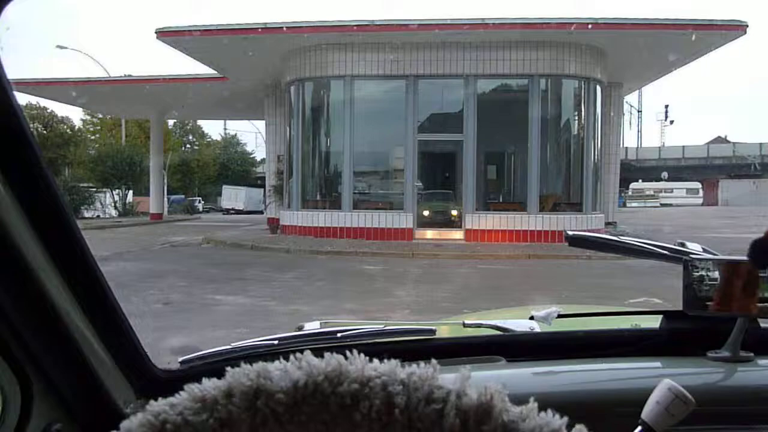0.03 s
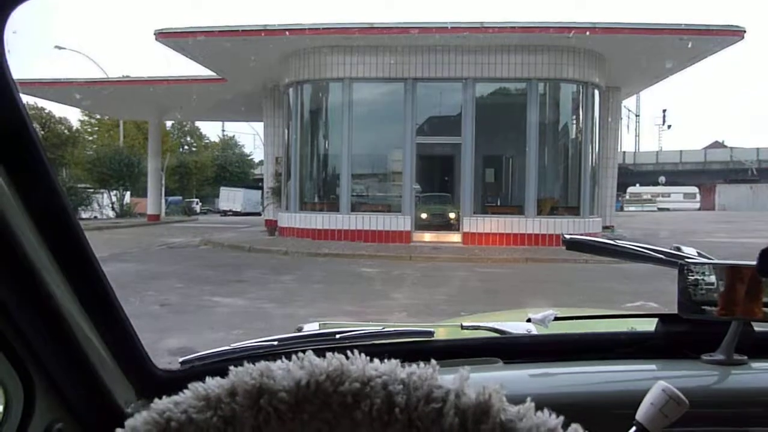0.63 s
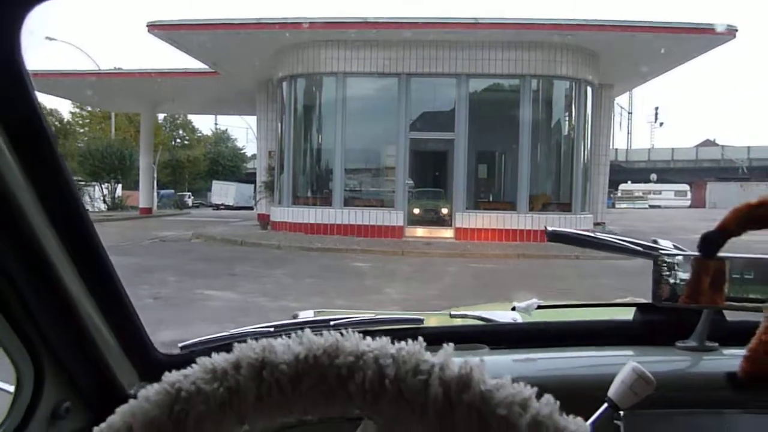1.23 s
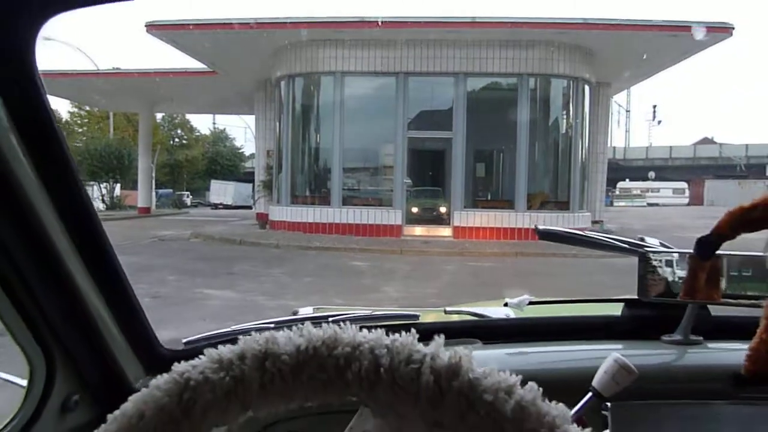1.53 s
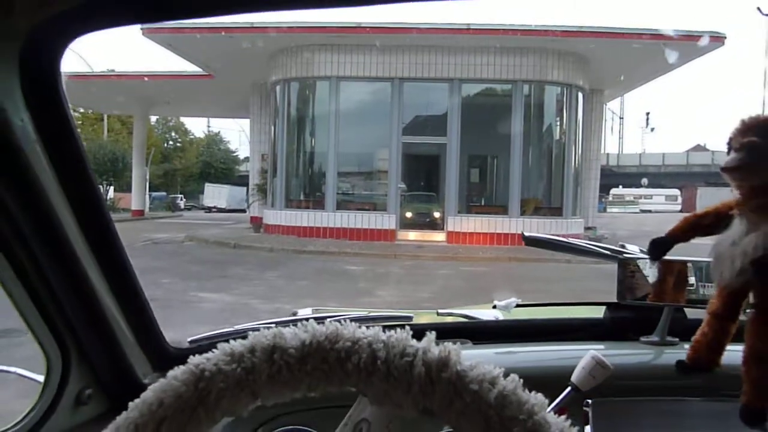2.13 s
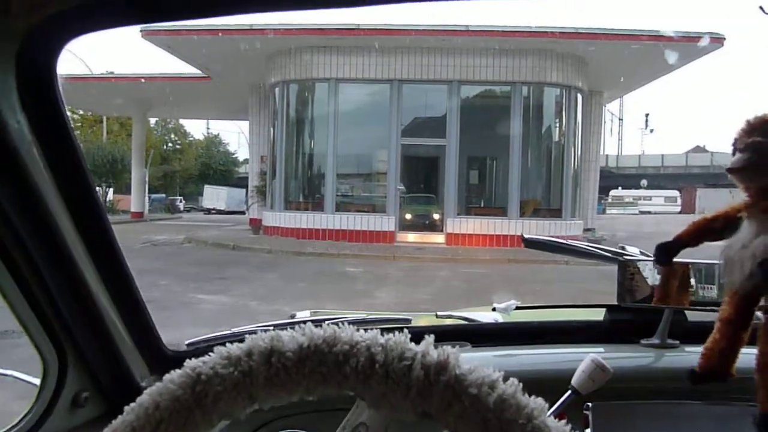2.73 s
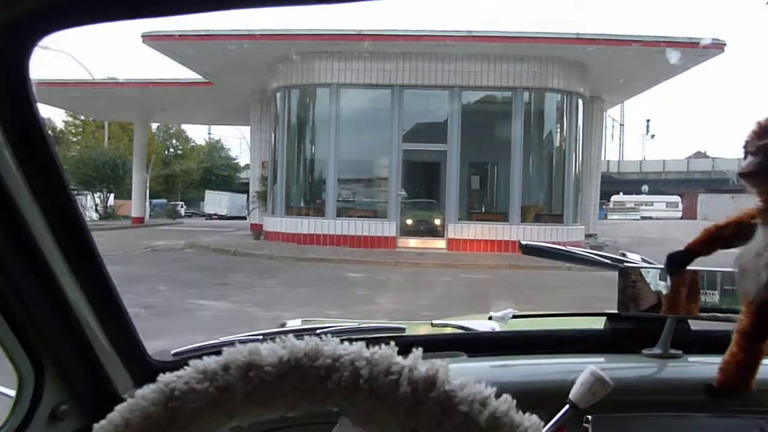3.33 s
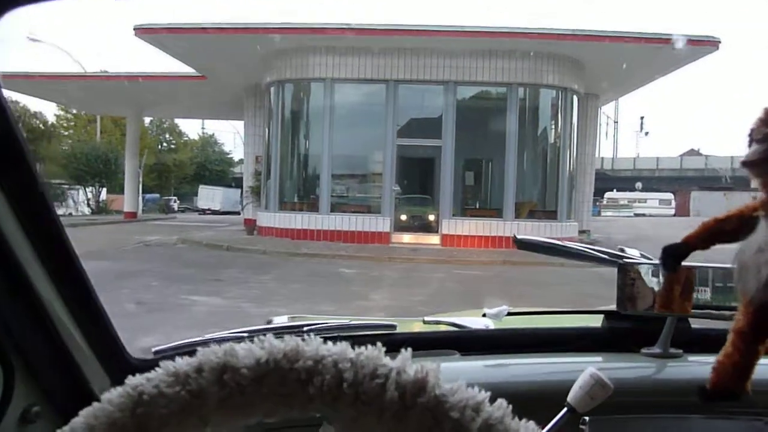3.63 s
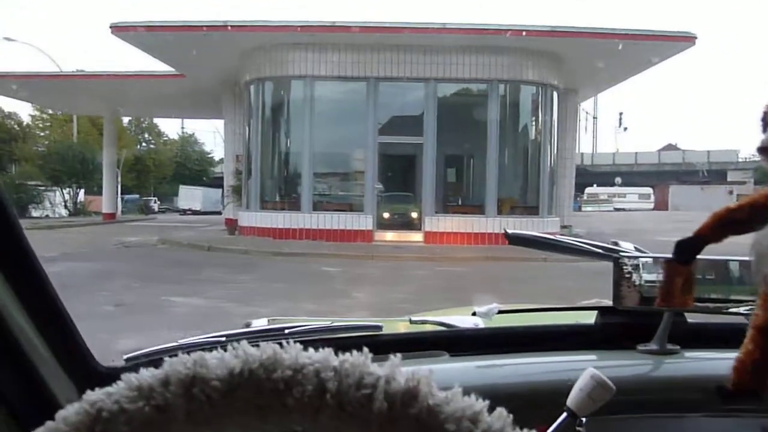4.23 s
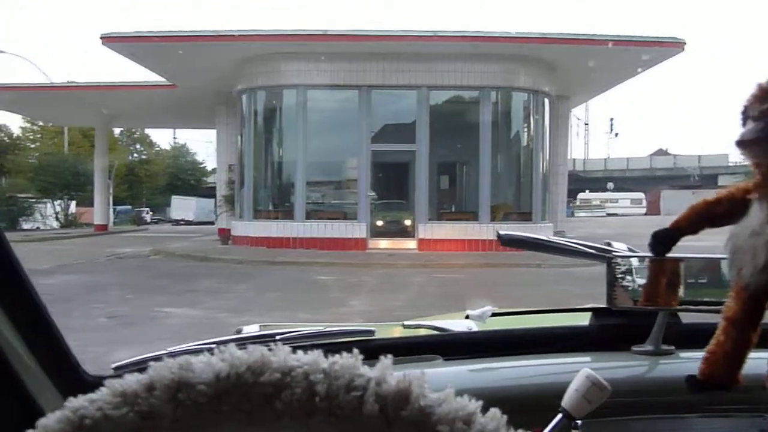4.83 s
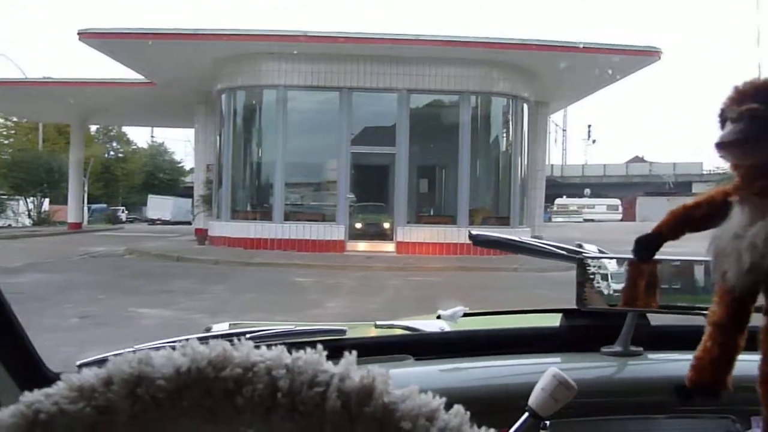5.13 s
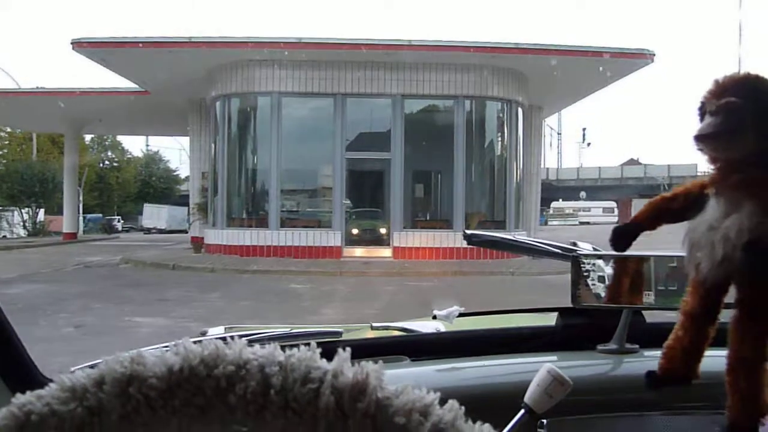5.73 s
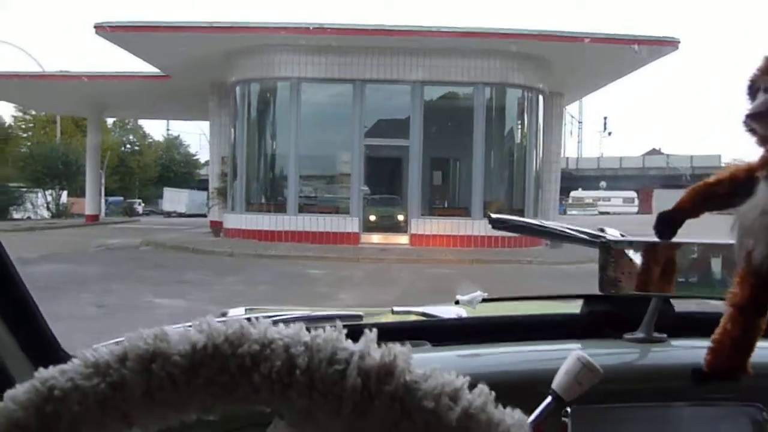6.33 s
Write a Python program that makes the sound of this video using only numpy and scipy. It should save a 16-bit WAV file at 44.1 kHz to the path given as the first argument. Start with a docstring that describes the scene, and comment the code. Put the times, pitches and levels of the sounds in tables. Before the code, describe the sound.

After silence, at about 0.6 seconds, the idle of a small old two-stroke car engine cuts in abruptly, heard from the driver's seat inside the cabin. It is a fast, low putter that holds the same overall speed but surges unevenly, about seven times a second. Each surge brings a short, hollow exhaust boom, over a deep hum from the shaking body and the drumming of sheet-metal panels. A lighter mechanical clatter comes from behind the dashboard. Loose metal parts give brief, faint clanks and clinks, scattered between 0.6 and 1.7 seconds and more often from about 2.9 seconds onward. The booming pulses grow slightly stronger after 3 seconds. At about 6 seconds a loose fitting gives two tiny, bright ticks in very quick succession. The engine keeps idling until the end, at about 6.4 seconds.

```python
"""The uneven idle of a small old two-stroke car engine cuts in after half a second of silence, heard from
the driver's seat. It fires about forty times a second and surges about seven times a second.
The body shakes, exhaust puffs excite booming standing waves in the cabin, and sheet-metal panels drum.
Behind the dashboard, pistons and loose parts clatter by impact; near the end a fitting ticks twice."""
import sys
import numpy as np
from scipy import signal
from scipy.fft import rfft, irfft, next_fast_len
from scipy.io import wavfile
from scipy.ndimage import uniform_filter1d

SR = 44100
rng = np.random.default_rng(int(sys.argv[2]) if len(sys.argv) > 2 else 0)


def file_out(sig):
    """Save sig as 16-bit WAV at sys.argv[1]."""
    # one column per channel
    cols = np.atleast_2d(sig).T
    # limit, then scale
    lim = np.clip(cols, -1, 1)
    pcm = np.round(lim * 32767).astype(np.int16)
    wavfile.write(sys.argv[1], SR, pcm)


N = 281313
TIME = np.arange(N) / SR

# Surges, where the engine catches for a few strong burns:
# (time [s], cabin boom [dB], drumming over idle [dB], clatter over idle [dB], shake over idle [dB])
SURGES = [(0.604, -38.0, 3.0, 3.5, 2.0), (0.733, -44.0, 4.0, 2.5, 2.0), (0.897, -49.0, 3.0, -1.0, 1.0),
          (1.138, -40.0, 3.0, 2.5, 2.0), (1.297, -37.0, 1.0, -0.0, -0.0), (1.415, -40.0, 3.0, 3.0, 2.0),
          (1.612, -43.0, 4.0, 2.0, 1.0), (1.756, -39.0, 2.0, 3.5, 1.0), (1.862, -45.0, -3.0, -2.0, -2.0),
          (2.039, -52.0, 4.0, 2.0, -0.0), (2.109, -38.0, 6.0, 0.0, 1.0), (2.273, -38.0, 3.0, -1.0, -0.0),
          (2.435, -45.0, -0.0, -0.5, 0.0), (2.673, -46.0, 0.0, 2.5, 4.0), (2.769, -39.0, 3.0, 3.0, 3.0),
          (2.879, -42.0, 6.0, 5.0, 5.0), (3.016, -40.0, 3.0, 0.5, 1.0), (3.111, -39.0, 4.0, 4.0, 4.0),
          (3.235, -34.0, 3.0, 1.5, 1.0), (3.411, -40.0, 4.0, 1.5, 0.0), (3.559, -37.0, 3.0, 2.5, 5.0),
          (3.731, -35.0, 1.0, 2.5, 7.0), (3.888, -39.0, 3.0, 1.0, 3.0), (4.022, -48.0, 1.0, 2.0, 2.0),
          (4.148, -34.0, 1.0, 0.5, 3.0), (4.296, -34.0, -0.0, 3.5, 3.0), (4.449, -37.0, 3.0, 1.5, 1.0),
          (4.591, -36.0, 3.0, 2.0, 2.0), (4.733, -38.0, 2.0, 4.5, 8.0), (4.866, -43.0, -3.0, 2.5, 7.0),
          (4.967, -42.0, 2.0, 1.0, 8.0), (5.148, -38.0, -3.0, 0.5, 6.0), (5.333, -41.0, -1.0, 2.0, 5.0),
          (5.472, -36.0, 0.0, 1.0, 5.0), (5.624, -40.0, -1.0, 0.0, 5.0), (5.739, -43.0, -2.0, 0.5, -0.0),
          (5.897, -35.0, -0.0, 1.5, 4.0), (6.053, -39.0, -0.0, 1.0, 3.0), (6.207, -40.0, 1.0, 1.5, 1.0),
          (6.326, -42.0, -1.0, 0.5, -4.0)]


def from_db(db):
    """Logarithmic level: amplitude grows tenfold every 20 dB."""
    return 10 ** (np.asarray(db) / 20)


def unit_power(x):
    """Normalisation: divide by the root mean square."""
    return x / np.sqrt(np.mean(x ** 2) + 1e-20)


def steady(x, span_s):
    """Running normalisation: unit power over each span, while quicker detail stays."""
    power = uniform_filter1d(x ** 2, max(int(span_s * SR), 3))
    return x / np.sqrt(np.abs(power) + 1e-12)


def in_time(rows):
    """Linear interpolation: each column of a time table at every sample."""
    times, *columns = np.transpose(rows)
    return [np.interp(TIME, times, column) for column in columns]


def resonate(x, hz, width_hz):
    """Damped resonance: a two-pole band-pass with unit gain at its peak."""
    radius = np.exp(-np.pi * width_hz / SR)
    feedback = [1, -2 * radius * np.cos(2 * np.pi * hz / SR), radius ** 2]
    return signal.lfilter(np.array([1, 0, -1]) * (1 - radius ** 2) / 2, feedback, x + 1e-18)


def modes(x, table):
    """Modal superposition: resonances driven in parallel add up."""
    return sum(from_db(db) * resonate(x, hz, width) for hz, width, db in table)


def boost(x, table):
    """Resonant emphasis: each mode in turn lifts the band around its frequency."""
    for hz, width, db in table:
        x = x + (from_db(db) - 1) * resonate(x, hz, width)
    return x


def colour(x, spectrum):
    """Spectral shaping: apply a gain curve that falls 24 dB per octave beyond both ends."""
    hz, db = np.transpose(spectrum)
    size = next_fast_len(N + SR // 4)
    octave = np.log2(np.maximum(np.arange(size // 2 + 1) * SR / size, 1))
    skirt_db = -24 * np.abs(octave - np.clip(octave, np.log2(hz[0]), np.log2(hz[-1])))
    gain = from_db(np.interp(octave, np.log2(hz), db) + skirt_db)
    return irfft(rfft(x, size) * gain, size)[:N]


def strokes(crank, phase, spread_db, jitter_s):
    """Impulse train: one click per firing at a fraction of the cycle, scattered in time and strength."""
    due_s = np.interp(np.arange(1, int(crank[-1])) + phase, crank, TIME)
    timing, strength = rng.standard_normal((len(due_s), 2)).T
    index = np.clip(((due_s + jitter_s * timing) * SR).astype(int), 0, N - 1)
    clicks = np.zeros(N)
    clicks[index] = from_db(spread_db * np.clip(strength, -2, 1.5))
    return clicks


def burst(clicks, decay_s):
    """Exponential decay: each click starts a dying cloud of noise; the whole has unit power."""
    envelope = signal.lfilter([1], [1, -np.exp(-1 / (decay_s * SR))], clicks + 1e-18)
    return unit_power(envelope * rng.standard_normal(N))


def swells(sizes, lead_s, half_width_s):
    """Gaussian envelopes: one bell of the given size peaks lead_s before each surge."""
    coarse = TIME[::40]
    bells = sum(size * np.exp(-((coarse - surge[0] + lead_s) / half_width_s) ** 2)
                for surge, size in zip(SURGES, sizes))
    return np.interp(TIME, coarse, bells)


def surge_levels():
    """Amplitude modulation: a surge reaches panels and block first, then the cabin air, then the body."""
    # The idle between surges: (time [s], body shake [dB], panel drumming [dB], clatter [dB])
    idle = [(.57, -34.5, -40.5, -55.5), (1.1, -35.5, -40, -57.5), (2.3, -35, -39.5, -56.5),
            (2.7, -36.5, -38, -57), (3.45, -35.5, -38, -55.5), (3.7, -38, -37, -56), (4.5, -35, -38, -55.5),
            (4.8, -39.5, -38.5, -57.5), (5.5, -39, -38, -56.5), (6.38, -35, -38.5, -56)]
    shake_db, panel_db, clatter_db = in_time(idle)
    _, surge_boom_db, panel_lift_db, clatter_lift_db, shake_lift_db = np.transpose(SURGES)
    panel_db += swells(panel_lift_db, lead_s=.028, half_width_s=.023)
    clatter_db += swells(clatter_lift_db, lead_s=.023, half_width_s=.023)
    resting_boom = from_db(-46.5)
    boom = resting_boom + swells(from_db(surge_boom_db), lead_s=0, half_width_s=.045)
    shake_db += swells(shake_lift_db, lead_s=-.0045, half_width_s=.033)
    return shake_db, 20 * np.log10(boom), panel_db, clatter_db


def body_hum(crank, shake_db):
    """Forced vibration: the engine rocks on its mounts at harmonics of the firing rate."""
    # Engine orders: (multiple of the firing rate, level relative to the shake [dB])
    orders = [(1, -.8), (2, -11), (3, -20), (5, -24), (6, -12.5), (7, -22), (8, -13)]
    surge_db = shake_db - uniform_filter1d(shake_db, SR // 4)
    # The crank runs ahead in each surge and drops back after it.
    cycles = crank + .009 * np.interp(TIME - .035, TIME, surge_db)
    harmonics = sum(-np.sqrt(2) * from_db(db) * np.sin(2 * np.pi * k * cycles) for k, db in orders)
    return from_db(shake_db) * harmonics


def silencer_rumble(crank, shake_db, boom_db):
    """Cycle-to-cycle variation: no two burns are alike, so the exhaust flutters between engine orders."""
    # Unsteady gas flow in the silencer: (frequency [Hz], relative spectral level [dB])
    spectrum = [(22, -2), (33, 1), (46, -2), (58, -4), (72, 0), (86, 2), (98, -2), (112, -1), (125, 0),
                (136, -9)]
    flow = burst(strokes(crank, phase=.24, spread_db=1.5, jitter_s=.0008), decay_s=.024)
    level_db = .7 * shake_db + .3 * boom_db - 2.9
    return steady(colour(flow, spectrum), span_s=.06) * from_db(level_db)


def cabin_boom(crank, boom_db, panel_db):
    """Standing waves: uneven exhaust puffs with turbulent tails ring the cabin air."""
    # Higher modes of the cabin air: (frequency [Hz], bandwidth [Hz], relative gain [dB])
    air_modes = [(238.2, 8.5, -3), (284.5, 7.3, -6.5), (320.6, 11, -6)]
    boom_hz, width_hz = 159.5, 14  # the strongest standing wave
    puffs = strokes(crank, phase=.2, spread_db=6.5, jitter_s=.00044)
    flow = unit_power(puffs) + from_db(6) * burst(puffs, decay_s=.024)
    drone = steady(modes(flow, air_modes), span_s=.055) * from_db(panel_db - 9.5)
    wave = resonate(resonate(flow, boom_hz, width_hz), boom_hz, 2 * width_hz)
    return drone + steady(wave, span_s=.077) * from_db(boom_db)


def panel_drumming(crank, panel_db):
    """Plate vibration: each firing and the rebound after it set the sheet metal drumming."""
    # Floor, doors and bulkhead: (frequency [Hz], relative spectral level [dB])
    spectrum = [(190, -5), (240, -3.5), (295, 1.5), (370, -7), (450, -7.5), (510, -12.5), (640, -15),
                (720, -20.5), (850, -18.5), (1050, -22.5), (1300, -24.5), (1700, -37.5), (2500, -38.5)]
    # Ringing of the sheet metal: (frequency [Hz], bandwidth [Hz], boost [dB])
    panel_modes = [(432, 30, 3), (535, 24, 3), (630, 30, 3), (765, 24, 4), (904, 26, 7), (936, 22, 6),
                   (1085, 20, 3), (1195, 20, 3), (1268, 22, 7)]
    knocks = strokes(crank, phase=.22, spread_db=-1, jitter_s=.00068)
    rebounds = strokes(crank, phase=.65, spread_db=.5, jitter_s=.0033)
    drive = burst(knocks + 1.1 * rebounds, decay_s=.035)
    sheet = boost(colour(drive, spectrum), panel_modes)
    return steady(sheet, span_s=.16) * from_db(panel_db)


def block_clatter(crank, clatter_db):
    """Impact excitation: piston slap and looser taps ring the block, over the rush of the fan."""
    # Engine block and fittings: (frequency [Hz], relative spectral level [dB])
    spectrum = [(900, 3), (1500, 8), (2100, 4), (2700, 2), (3300, 1), (4000, -4), (4600, -5), (5200, -10),
                (6100, -14), (6800, -43)]
    # Ringing of the block: (frequency [Hz], bandwidth [Hz], boost [dB])
    block_modes = [(1500, 30, 3), (2012, 36, 7.5), (2160, 60, 4), (2460, 36, 7.5), (3000, 50, 2),
                   (3320, 80, 4.5), (3668, 36, 5.5), (5540, 80, 3.5), (6560, 70, 4)]
    slap = strokes(crank, phase=.12, spread_db=3, jitter_s=.0011)
    taps = strokes(crank, phase=.26, spread_db=6, jitter_s=.003)
    taps += strokes(crank, phase=.6, spread_db=.5, jitter_s=.004)
    impacts = burst(slap, decay_s=.0069) * from_db(-5) + burst(taps, decay_s=.0023) * from_db(-7)
    fan = rng.standard_normal(N)
    block = boost(colour(impacts + fan, spectrum), block_modes)
    return steady(block, span_s=.052) * from_db(clatter_db)


def loose_rattles():
    """Contact chatter: a quick swell of small collisions excites the modes of a loose part."""
    # Loose parts thrown by the hardest surges: (time [s], low clank [dB], high clink [dB])
    hard_rattles = [(.582, -54, -63), (.712, -57, -65), (1.105, -61, -66), (1.413, -70, -60),
                    (1.63, -62, -58), (1.716, -55, -60), (2.852, -54.5, -57), (3.082, -52.5, -63),
                    (3.495, -66, -59), (3.78, -56.5, -65), (3.864, -55, -58.5), (4.007, -58, -58),
                    (4.186, -54.5, -71), (4.264, -51.5, -70), (4.393, -56.5, -66), (4.842, -51.5, -79),
                    (5.419, -56.5, -61), (5.703, -53, -65), (5.846, -57, -59), (6.128, -56, -74),
                    (6.254, -54, -69)]
    # Low modes of the parts: (frequency [Hz], bandwidth [Hz], relative gain [dB])
    clank_modes = [(1640, 260, -7.5), (1990, 83, 5), (2084, 62, 10), (2440, 70, -12), (2740, 270, -11.5)]
    # High modes of the parts: (frequency [Hz], bandwidth [Hz], relative gain [dB])
    clink_modes = [(3330, 150, 5.5), (3550, 90, 1.5), (3750, 69, -6)]
    light_chance, max_lead_s, rise_s = .3, .046, .0097
    # Lighter rattles come by chance, just ahead of a surge.
    draws = rng.random((len(SURGES), 2))
    light_rattles = [(surge[0] - max_lead_s * early, -62, -67)
                     for surge, (draw, early) in zip(SURGES, draws) if draw < light_chance]
    envelopes = np.zeros((2, N))
    for start_s, clank_db, clink_db in hard_rattles + light_rattles:
        age = np.maximum(TIME - start_s, 0) / rise_s
        envelopes += from_db([[clank_db], [clink_db]]) * age * np.exp(1 - age)
    clank = steady(modes(rng.standard_normal(N), clank_modes), span_s=.073)
    clink = steady(modes(rng.standard_normal(N), clink_modes), span_s=.073)
    return envelopes[0] * clank + envelopes[1] * clink


def fitting_ticks():
    """Heavily damped resonance: a loose fitting ticks, bright and short."""
    # Contacts of the fitting: (time [s], level before the resonance [dB])
    contacts = [(6.006, -46), (6.021, -43)]
    ring_hz, width_hz, decay_s = 5200, 2400, .003
    drive = np.zeros(N)
    for start_s, db in contacts:
        envelope = (TIME >= start_s) * np.exp(-np.abs(TIME - start_s) / decay_s)
        drive += from_db(db) * envelope * rng.standard_normal(N)
    return resonate(resonate(drive, ring_hz, width_hz), ring_hz, width_hz)


def scene():
    """Superposition: engine layers locked to one crank add to the rattles and ticks."""
    # Engine speed: (time [s], firing rate [Hz])
    speed = [(.57, 39.02), (1.2, 39.02), (1.8, 39.47), (2.4, 39.54), (3.0, 39.56), (3.6, 39.67),
             (4.3, 40.06), (4.9, 39.68), (6.38, 39.72)]
    crank = np.cumsum(in_time(speed)[0]) / SR  # firing cycles elapsed
    shake_db, boom_db, panel_db, clatter_db = surge_levels()
    body = body_hum(crank, shake_db)
    exhaust = silencer_rumble(crank, shake_db, boom_db) + cabin_boom(crank, boom_db, panel_db)
    metal = panel_drumming(crank, panel_db) + block_clatter(crank, clatter_db)
    return (body + exhaust + metal + loose_rattles() + fitting_ticks())[None]


def record(dry):
    """Band limiting: the microphone opens abruptly and drops the deepest bass and the high treble."""
    start_s, low_hz, high_hz = .572, 19, 6950
    highpass = signal.butter(4, low_hz, "high", fs=SR, output="sos")
    lowpass = signal.butter(24, high_hz, fs=SR, output="sos")
    gated = signal.sosfilt(highpass, dry) * (TIME >= start_s)
    return signal.sosfilt(lowpass, gated)


dry = scene()
out = record(dry)
file_out(out)
```